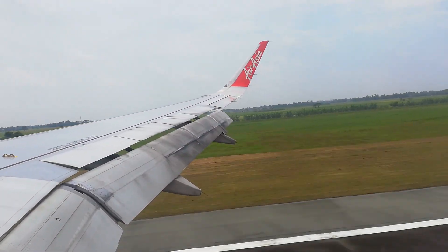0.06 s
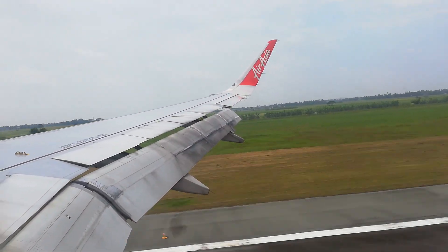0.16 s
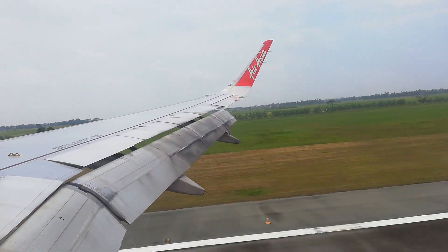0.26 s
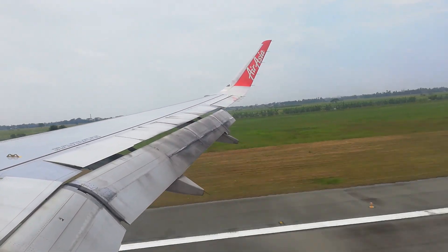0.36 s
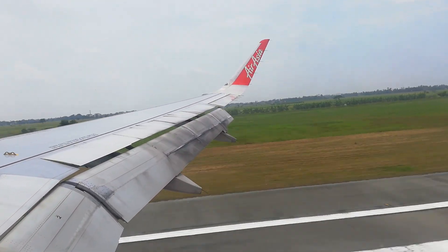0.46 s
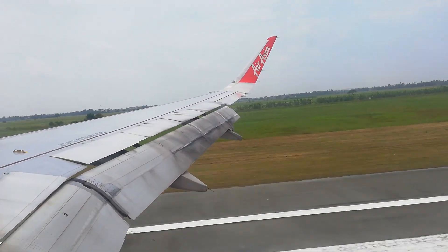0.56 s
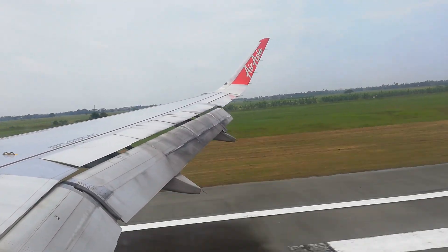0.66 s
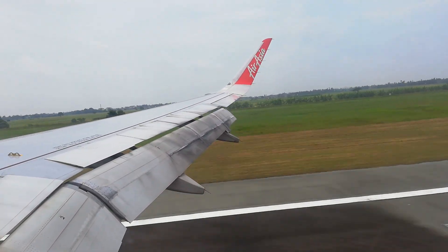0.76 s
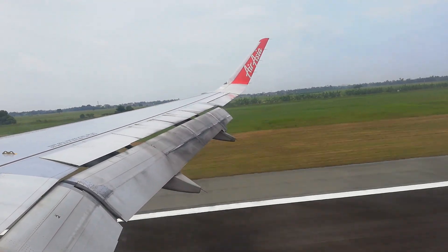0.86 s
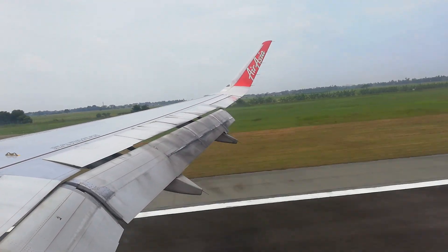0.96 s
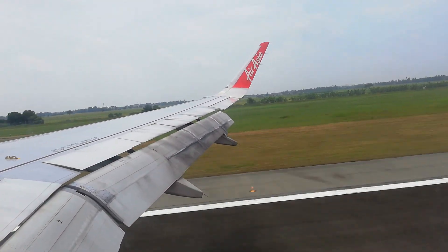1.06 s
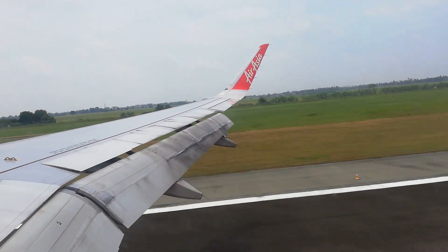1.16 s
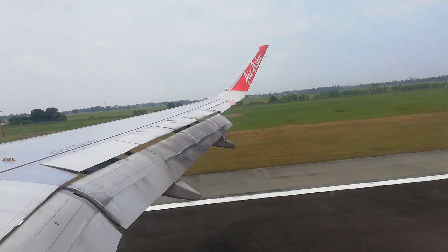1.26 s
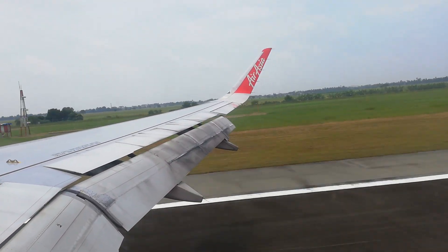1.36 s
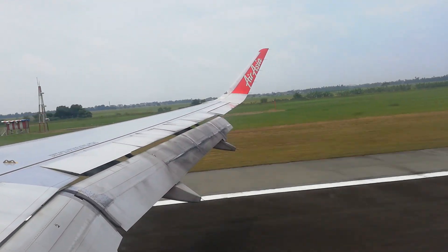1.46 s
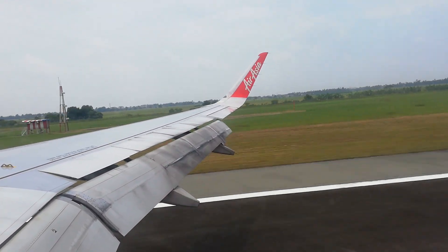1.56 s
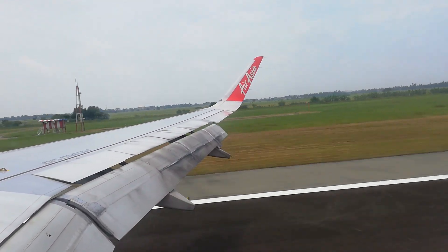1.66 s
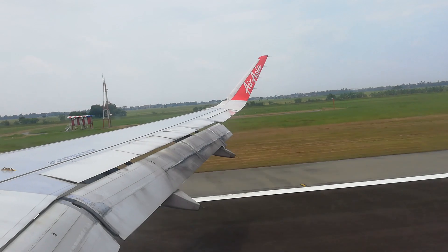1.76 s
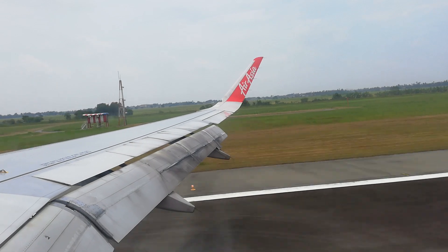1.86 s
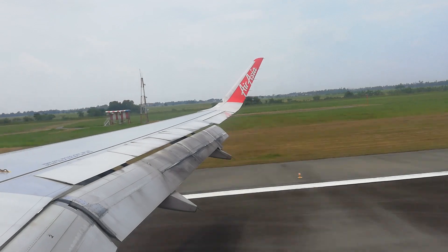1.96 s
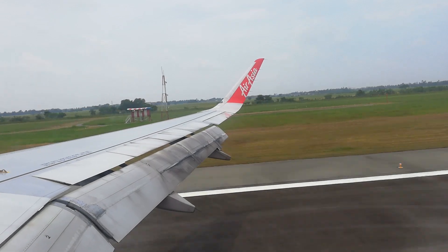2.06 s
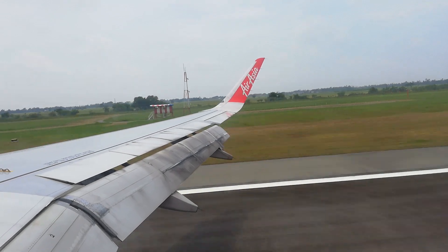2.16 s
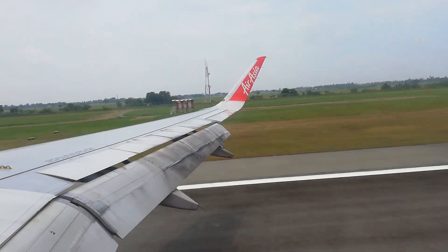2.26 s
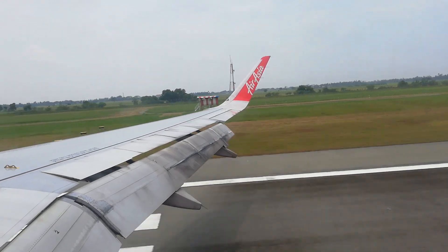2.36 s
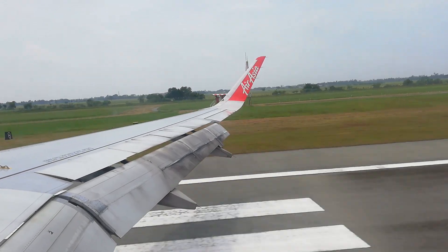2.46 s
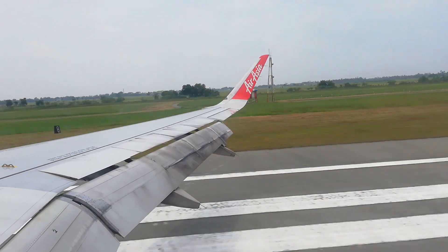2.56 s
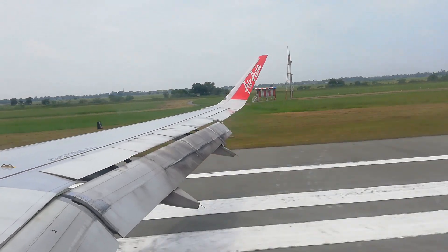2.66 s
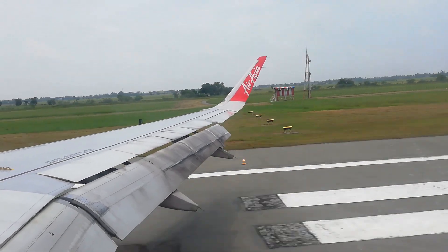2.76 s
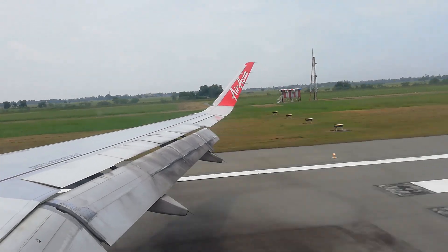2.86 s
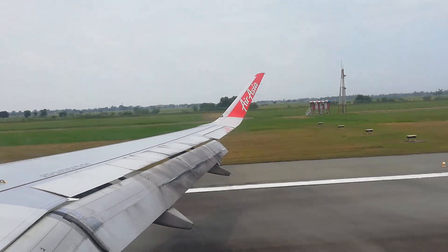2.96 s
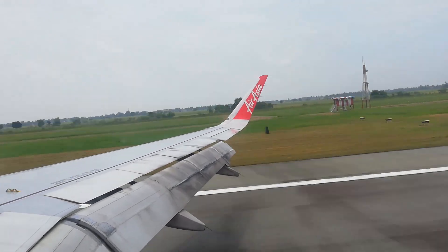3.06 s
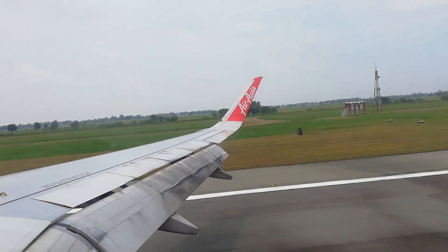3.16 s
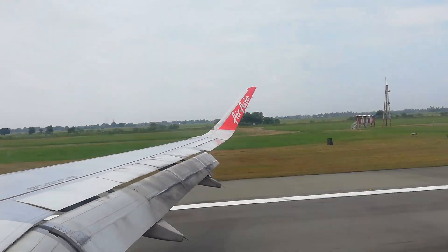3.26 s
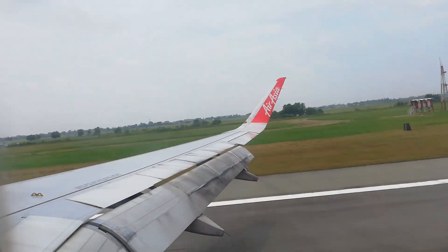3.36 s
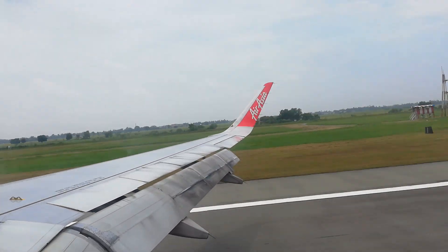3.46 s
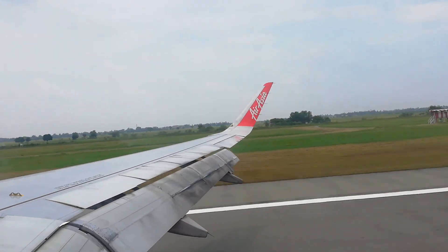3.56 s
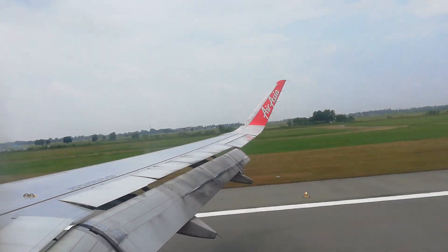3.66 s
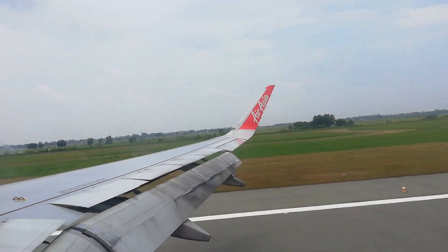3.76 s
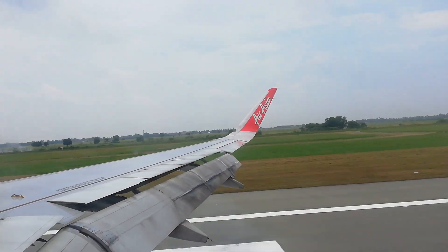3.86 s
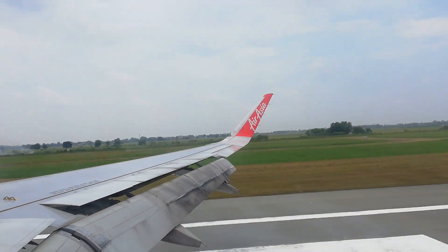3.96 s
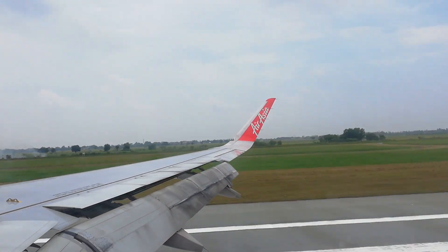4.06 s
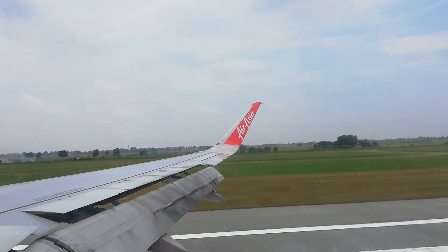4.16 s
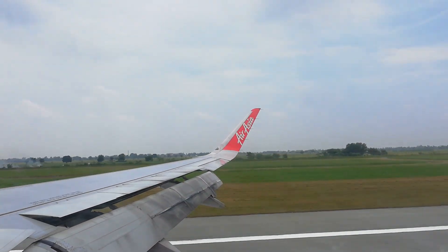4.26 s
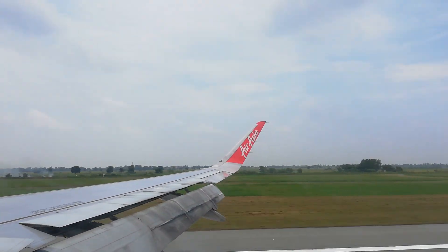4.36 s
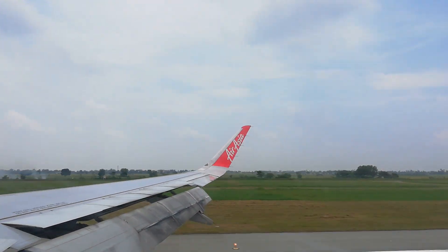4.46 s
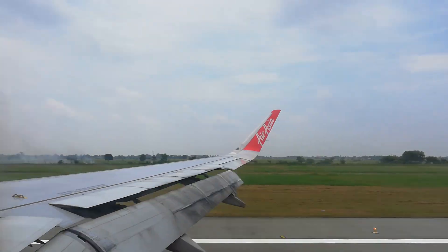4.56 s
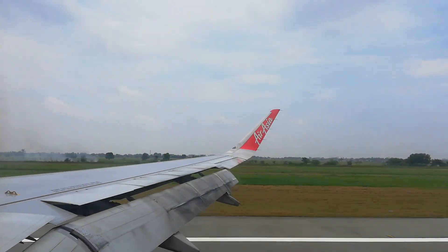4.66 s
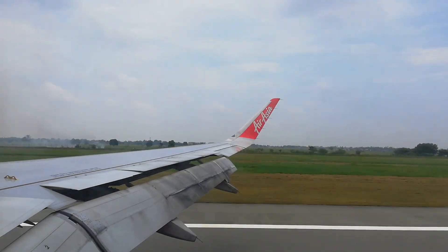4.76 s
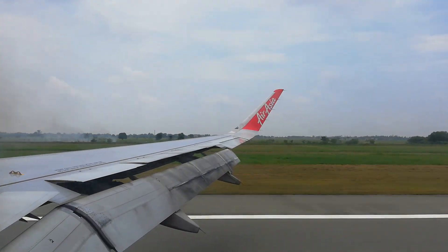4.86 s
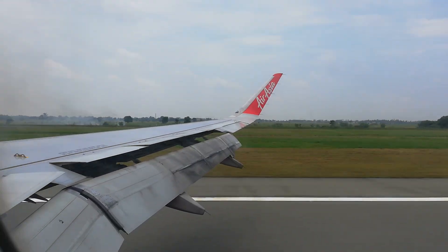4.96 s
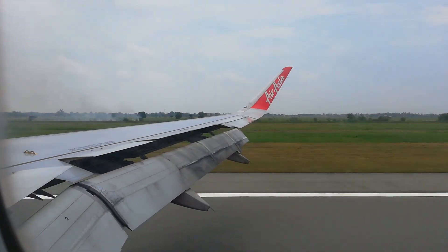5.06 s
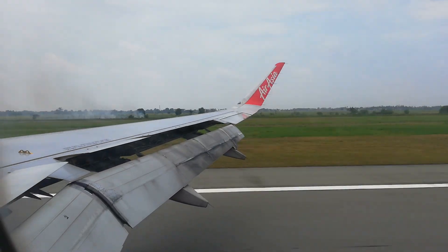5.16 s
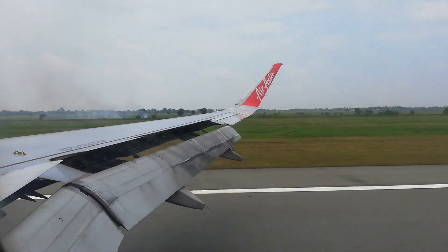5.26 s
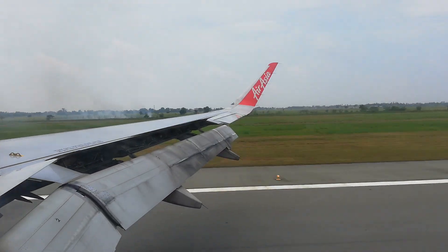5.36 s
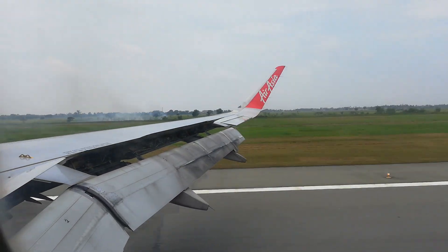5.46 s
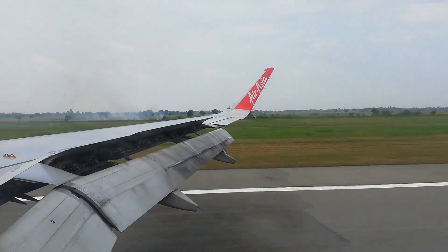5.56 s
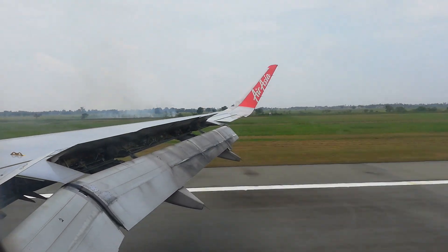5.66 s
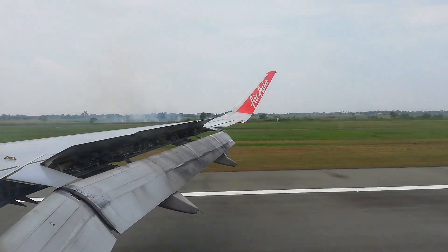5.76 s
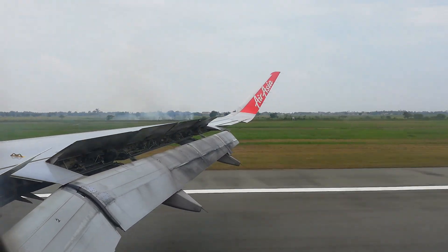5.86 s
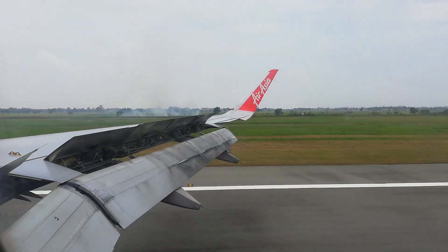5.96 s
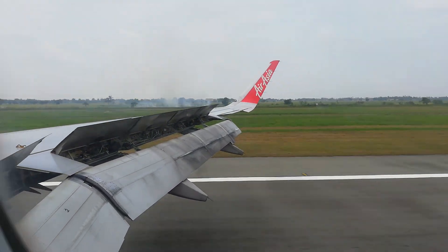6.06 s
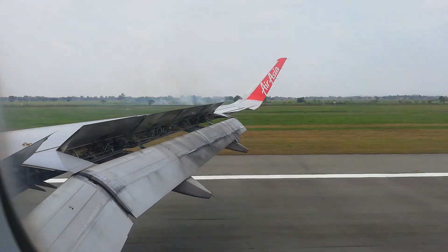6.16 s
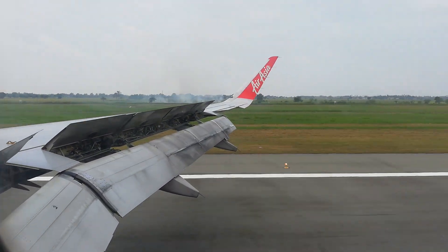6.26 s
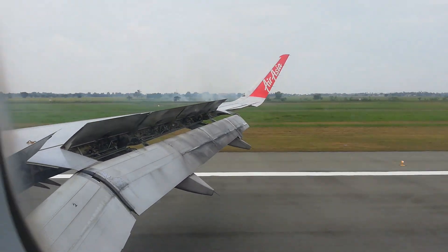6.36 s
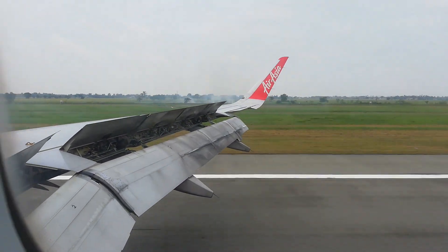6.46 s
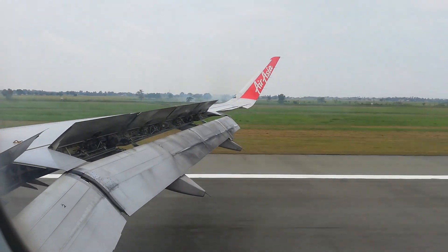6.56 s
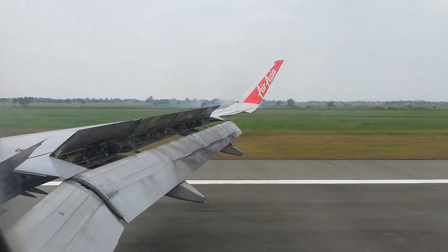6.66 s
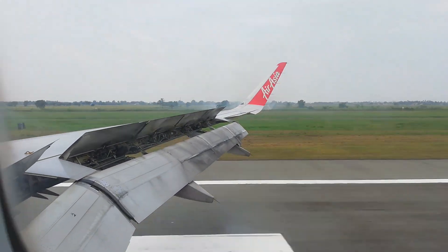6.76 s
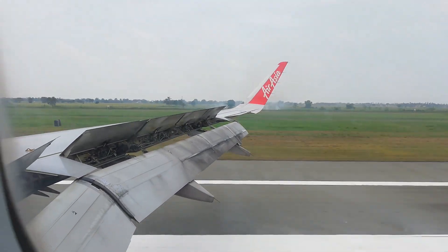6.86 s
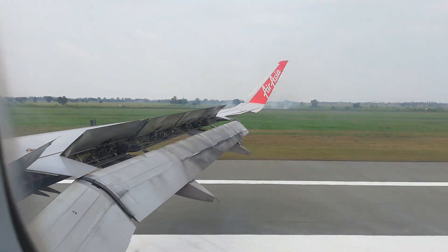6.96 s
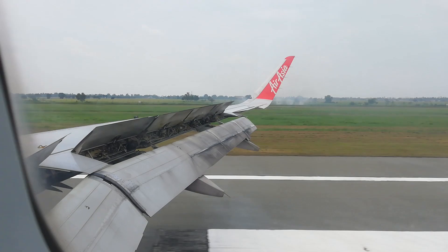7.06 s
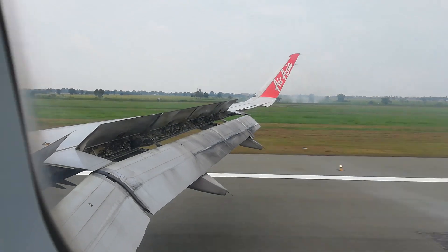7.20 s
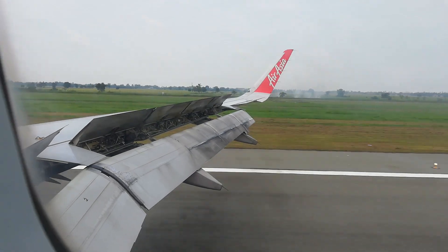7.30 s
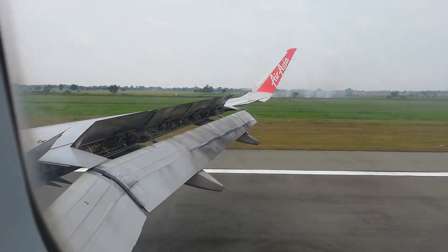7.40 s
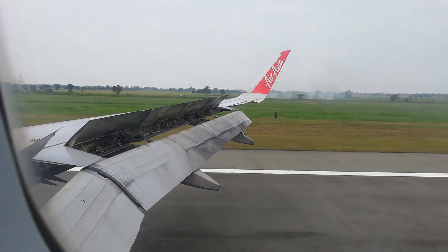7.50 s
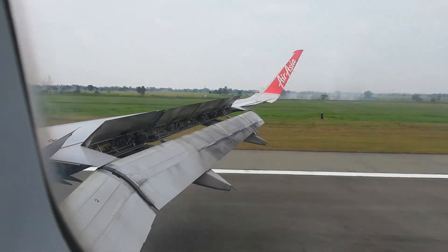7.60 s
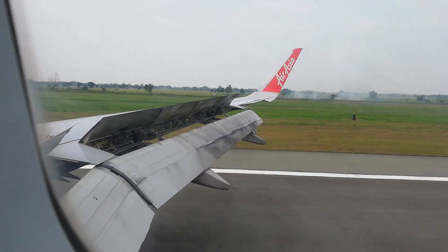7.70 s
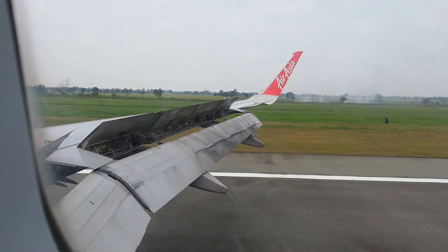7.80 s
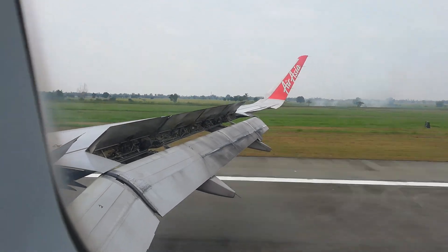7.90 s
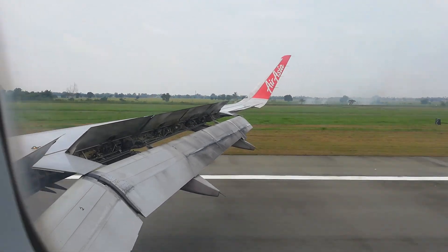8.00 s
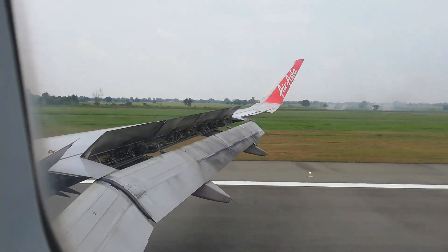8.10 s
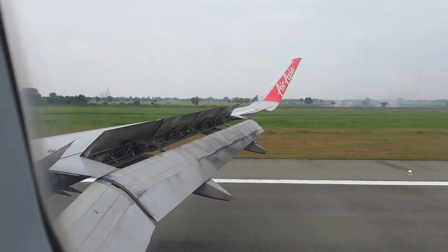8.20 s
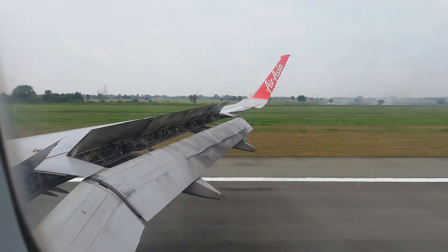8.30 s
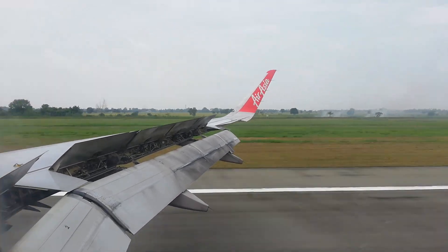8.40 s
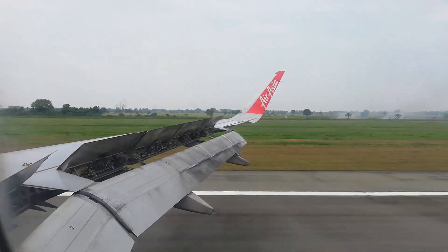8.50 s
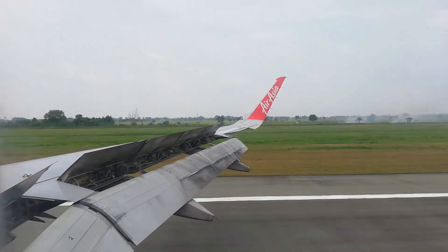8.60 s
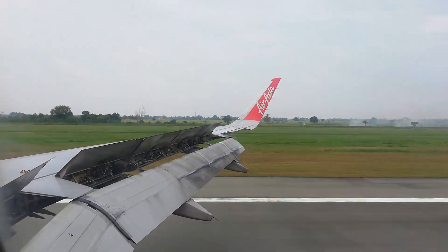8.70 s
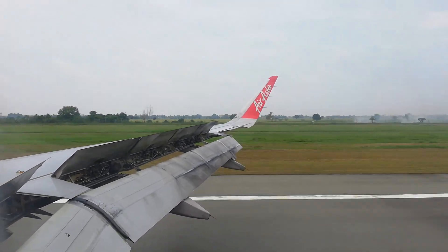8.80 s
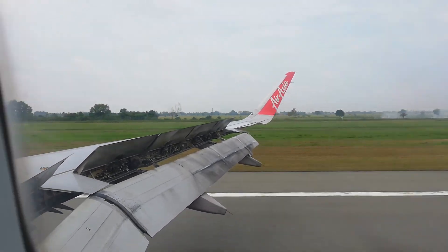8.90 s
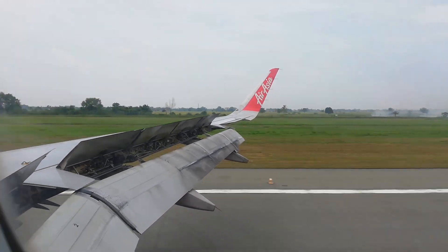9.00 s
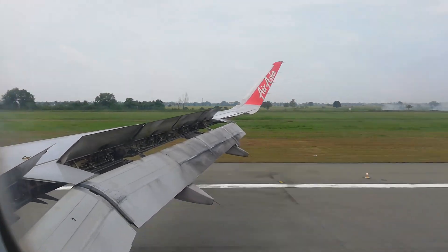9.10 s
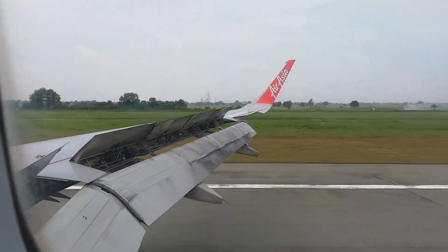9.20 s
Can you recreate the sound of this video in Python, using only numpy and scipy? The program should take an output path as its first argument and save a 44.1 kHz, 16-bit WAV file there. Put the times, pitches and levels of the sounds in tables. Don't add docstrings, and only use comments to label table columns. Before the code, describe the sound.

Handheld phone microphone at a cabin window during landing. First a muffled engine drone, vent and slipstream hiss, faint fan hum and a few tiny clicks. Then a touchdown jolt with clattering trim and hollow overhead bins, followed by much stronger floor boom. Irregular dry panel knocks and latch clicks continue to the end over surging engine roar, with a faint shaft whine rising late.

```python
import sys
import numpy as np
from scipy import signal
from scipy.fft import rfft, irfft, next_fast_len
from scipy.io import wavfile
from scipy.ndimage import uniform_filter1d

SR = 44100
rng = np.random.default_rng(int(sys.argv[2]) if len(sys.argv) > 2 else 0)


def invert_db(x):
    u = np.asarray(x, float) / 20
    return 10 ** u


def materialize(psi):
    bounded = np.clip(np.atleast_2d(psi).T, -1, 1)
    quanta = np.round(bounded * 32767).astype(np.int16)
    wavfile.write(sys.argv[1], SR, quanta)


N = 407484
T = np.arange(N) / SR
TOUCHDOWN_S, SETTLE_S = 2.94, .012
PORT_LAG_S = 26 / SR
PANEL_LAG_S = 23 / SR


def evened(x):
    return x / np.sqrt(np.mean(x ** 2) + 1e-20)


def smooth(x, length):
    return uniform_filter1d(uniform_filter1d(x, size=length), size=length)


def patchy(grid, time_size, hz_size):
    blurred = uniform_filter1d(grid, size=time_size, axis=0)
    return evened(uniform_filter1d(blurred, size=hz_size, axis=1))


def read(points, hz):
    f, value = np.transpose(points)
    return np.interp(np.log(hz + 1), np.log(f + 1), value)


def column(rows, index, t=T):
    rows = np.array(rows)
    return np.interp(t, rows[:, 0], rows[:, index])


def band(x, lo_hz, hi_hz):
    edges = [lo_hz, min(hi_hz, SR / 2.1)]
    return signal.sosfilt(signal.butter(2, edges, "band", fs=SR, output="sos"), x)


def add(mix, s, sound):
    part = mix[:, round(s * SR):][:, :sound.shape[1]]
    part += sound[:, :part.shape[1]]


def strike(t, rise_s, t60, tail_db, tail_t60):
    ring = invert_db(-60 * t / t60) + invert_db(tail_db - 60 * t / tail_t60)
    return (1 - np.exp(-t / rise_s)) * ring


def rolling(t):
    return .5 + .5 * np.tanh((t - TOUCHDOWN_S) / SETTLE_S)


def swells_db(rows, rise, flying_db, rolling_db):
    fade_db = 8.5
    roundness = 1.27
    t = np.arange(0, N / SR + .002, .002)
    peak_s, db, length_s = (v[:, None] for v in np.transpose(rows))
    rise = (rise * np.ones(len(rows)))[:, None]
    away = np.where(t < peak_s, (peak_s - t) / rise, t - peak_s) / length_s
    bed_db = flying_db + (rolling_db - flying_db) * rolling(t)
    swells = invert_db(2 * (db - fade_db * away ** roundness)).sum(0)
    return np.interp(T, t, 10 * np.log10(invert_db(2 * bed_db) + swells))


# pitch_hz, likeness_0_to_1
PORT_LIKENESS = [(60, 1), (160, 0.97), (300, 0.9), (500, 0.62), (1000, 0.14), (2000, 0.42), (5000, 0),
                 (15000, 0.1)]
# pitch_hz, lag_s
FIELD_LAG = [(60, 0.00027), (250, 0.00015), (430, 0.00024), (700, 0.00076), (1200, 0.00067),
             (16000, 0.00057)]


def diffuse(field_db, size, patchy_db, band_hz):
    hop = size // 4
    hz = np.fft.rfftfreq(size, 1 / SR)[:, None]
    t = np.arange(N // hop + 5) * hop / SR
    a, b, c, d, patches = rng.standard_normal((len(t), len(hz), 5)).T
    same = np.clip(read(PORT_LIKENESS, hz), 0, 1)
    right = a + 1j * b
    delayed = right * np.exp(-2j * np.pi * hz * read(FIELD_LAG, hz))
    left = same * delayed + np.sqrt(1 - same ** 2) * (c + 1j * d)
    z = np.array([left, right]) * invert_db(field_db(hz, t) + patchy_db * patchy(patches, 5, 9))
    inside = (hz > band_hz[0]) & (hz < band_hz[1])
    whole, part = (signal.istft(v, nperseg=size, noverlap=size - hop)[1][:, :N] for v in (z, z * inside))
    return whole / np.sqrt(np.mean(part ** 2))


def tone(hz, db):
    drift, fade = (evened(smooth(v, 3000)) for v in rng.standard_normal((2, N)))
    turn = 2 * np.pi * np.cumsum(hz * (1 + 0.00416 * drift)) / SR
    late = turn - 2 * np.pi * hz * read(FIELD_LAG, hz)
    return np.sqrt(2) * invert_db(db + 1.2 * fade) * np.sin([late, turn])


# pitch_hz, level_db
AIR = [(260, -17), (450, -2.5), (523, -3), (599, -6), (1080, -10), (1180, -14.5), (1430, -18), (2150, -17),
       (2420, -24), (4360, -22.5), (5140, -26), (8970, -29.5), (11900, -34), (13300, -48), (15600, -49),
       (16400, -62)]
# pitch_hz, change_db
ROLLING_HISS = [(600, -1.2), (1500, 2), (2500, 1), (3500, -2.5), (4800, -3), (5200, -7)]
# peak_s, level_db, length_s
JOSTLES = [(3.03, -43, 0.14), (3.17, -45, .08), (4.26, -47, 0.073), (4.38, -53, 0.13), (4.55, -43.5, 0.14),
           (4.68, -45.5, 0.076), (4.78, -49, .05), (4.89, -46, .06), (5.9, -50, 0.82), (7.05, -47, 0.33),
           (7.43, -47, 0.18), (7.73, -46.5, 0.25), (8.05, -47.5, 0.23), (8.7, -49.5, 1)]


def airflow():
    def field_db(hz, t):
        lining_edge_db = 3.5 * np.tanh((4850 - hz) / 50.)
        return read(AIR, hz) + lining_edge_db + read(ROLLING_HISS, hz) * rolling(t)
    hiss = diffuse(field_db, size=1024, patchy_db=1.2, band_hz=(600, 2600))
    return invert_db(swells_db(JOSTLES, rise=0.68, flying_db=-46.5, rolling_db=-48)) * hiss


# peak_s, level_db, length_s
DRAUGHTS = [
    (3.92, -57, 0.09),
    (4.18, -57, .06),
    (4.37, -48, .1),
    (5.4, -65, 0.33),
    (6.15, -50, 0.18),
    (6.6, -50, 0.2),
    (7.3, -57, 0.13),
    (7.65, -55, 0.12),
]


def window_whistle():
    def field_db(hz, t):
        centre_hz = 1225 + 18 * np.sin(2 * np.pi * 2.3 * t)
        return -18. * np.log10(1 + ((hz - centre_hz) / 48.) ** 2)
    whistle = diffuse(field_db, size=1024, patchy_db=3, band_hz=(1140, 1300))
    return invert_db(swells_db(DRAUGHTS, rise=0.72, flying_db=-57.5, rolling_db=-58.0) - 1.5) * whistle


# pitch_hz, level_db
WALL = [(53, -74), (90, 10.5), (103, -8.5), (113, -4), (188, 0), (394, -16), (433, -23.5), (527, -42),
        (700, -28), (910, -42), (1540, -120)]
# time_s, level_db, upper_roar_db
DRONE = [(0, -27.5, 1), (1.5, -24, -3), (2.9, -25.5, -1), (2.97, -33.5, 9), (3.07, -30.5, 1.5),
         (3.55, -24, -1.5), (3.9, -32, -3.5), (4.05, -25, 1.5), (4.22, -28, -2.5), (4.5, -25, 1.5),
         (4.75, -33.5, 9.5), (5.1, -24, -2.5), (5.4, -34, 7.5), (5.7, -25.5, -1), (6.2, -31, 1.5),
         (6.65, -22, -2), (7.4, -22.5, -6.5), (9.24, -24, -3)]


def wall_drone():
    def field_db(hz, t):
        return read(WALL, hz) + column(DRONE, 2, t) * np.clip((hz - 200) / 82.0, 0, 1)
    drone = diffuse(field_db, size=2048, patchy_db=1.65, band_hz=(125, 450))
    return invert_db(column(DRONE, 1) - 0.5) * drone


# time_s, pitch_hz, level_db
SHAFT = [(0, 545.4, -61), (1.2, 542, -55.5), (1.55, 536.5, -46), (1.8, 534.4, -47), (2.1, 530, -55.5),
         (2.27, 533, -43.5), (2.45, 524, -57), (2.65, 519, -47), (2.8, 513.6, -60), (3.2, 510.3, -63),
         (6.8, 476, -88), (7.12, 491, -53), (7.5, 481, -45), (7.9, 496, -45.5), (8.1, 501, -53),
         (8.5, 506, -51), (8.95, 518, -49.5), (9.24, 503, -53)]


def shaft_tone():
    hz, db = column(SHAFT, 1), column(SHAFT, 2)
    half_db = -38.5 + 0.29 * (db + 50)
    return tone(hz, db) + tone(hz * .485, half_db)


# pitch_hz, level_db
FANS = [
    (905, -56),
    (1155, -62),
]


def cabin_fans():
    return sum(tone(hz, db - 8.7 * rolling(T)) for hz, db in FANS)


# pitch_hz, level_db
FLOOR = [(11, -31), (20, -7), (31, -1.5), (41, 1.5), (59, 1.5), (110, -3), (145, -15.5), (172, -14),
         (260, -31.5), (400, -100)]
# time_s, pitch_hz, level_db
BOOM = [(0, 64, -4.5), (2.8, 59, 6.5), (3.1, 61.7, 9), (4.5, 60.6, 3), (5.8, 59, 2.5), (7.5, 49, 3.5),
        (9.24, 53, 4)]
# peak_s, level_db, length_s
BUMPS = [(.0, -20.5, 0.86), (.33, -21, 0.095), (.77, -20.5, 0.13), (1.85, -21, 0.22), (2.77, -21.5, 0.12),
         (2.99, -14.5, 0.071), (3.08, -13, 0.11), (3.19, -10.5, 0.25), (3.57, -12.5, 0.046),
         (3.77, -8.5, 0.048), (4.18, -10.5, 0.036), (4.58, -10, 0.31), (5.0, -14.5, 0.12),
         (5.26, -16, 0.041), (5.39, -11, 0.05), (5.58, -12, 0.035), (5.81, -9.5, 0.16), (6.1, -16.5, 0.22),
         (6.27, -12.5, .1), (6.44, -6, 0.049), (6.9, -13.5, 0.52), (7.2, -12, 0.26), (7.6, -12.5, 0.41),
         (8.12, -8.5, 0.14), (8.3, -11, 0.062), (8.45, -11, 0.24), (8.75, -6.5, 0.062), (8.93, -10, 0.024),
         (9.07, -10.5, 0.15)]


def floor_shake():
    def field_db(hz, t):
        hump = np.exp(-((hz - column(BOOM, 1, t)) / 10.0) ** 2)
        return read(FLOOR, hz) + column(BOOM, 2, t) * hump
    boom = diffuse(field_db, size=4096, patchy_db=1.0, band_hz=(22, 125))
    lumps = np.sqrt(uniform_filter1d((boom ** 2).mean(0), size=3000) + 1e-4)
    shake_db = swells_db(BUMPS, rise=0.71, flying_db=-25.5, rolling_db=-17)
    return invert_db(shake_db) * boom / lumps ** .85


# start_s, peak_db, pitch_hz
THUDS = [(.08, -60, 1946), (2.953, -51.5, 1750), (2.984, -46, 624), (3.09, -52, 1150), (3.237, -62, 1130),
         (3.307, -50, 890), (4.363, -49.5, 1254), (9.106, -53, 1420), (9.129, -55, 1320),
         (3.027, -41.5, 806), (3.149, -41, 915), (3.187, -40, 800), (3.255, -46, 880), (3.46, -43, 739),
         (4.222, -46, 846), (4.229, -56, 1490), (4.25, -45, 910), (4.272, -55, 1500), (4.507, -40, 880),
         (4.546, -39, 760), (4.577, -39, 746), (4.663, -45, 840), (4.693, -51, 1460), (6.959, -49, 1090),
         (7.725, -54, 1022), (8.111, -50, 765.2), (8.802, -51, 1006)]


def locker_thuds():
    out, t = np.zeros((2, N)), np.arange(4000) / SR
    for (s, db, hz), noise in zip(THUDS, rng.standard_normal((len(THUDS), len(t)))):
        rough = evened(band(band(noise, .65 * hz, 1.3 * hz), .5 * hz, 1.5 * hz))
        ring = .95 * np.sin(2 * np.pi * hz * t) + .55 * rough
        ring = ring * strike(t, .001, .12, -9, .3) * invert_db(3)
        add(out, s, invert_db(db + 7) * np.array([.6 * np.roll(ring, round(PORT_LAG_S * SR)), ring]))
    return out


# start_s, level_db, pitch_hz, t60_s, fuzz_0_to_1
PINGS = [
    (1.437, -54, 5700, .08, 1),
    (4.052, -57, 5870, .16, .25),
    (.016, -55, 10400, .2, 1),
    (.022, -59, 8500, .25, 1),
    (.436, -61, 8300, .5, 1),
    (.49, -60, 8200, .3, 1),
    (.47, -64, 10900, .5, 1),
    (.46, -63, 5700, .6, 1),
    (.52, -63, 6000, .4, 1),
    (5.865, -57, 5400, .2, .3),
]


def fitting_pings():
    out, t = np.zeros((2, N)), np.arange(8000) / SR
    for (s, db, hz, t60, fuzz), noise in zip(PINGS, rng.standard_normal((len(PINGS), 2, len(t)))):
        fuzzy = evened(band(band(noise, .9 * hz, 1.1 * hz), .9 * hz, 1.1 * hz))
        clear = np.sqrt(2) * np.sin(2 * np.pi * hz * t)
        add(out, s, invert_db(db - 60 * t / t60) * (fuzz * fuzzy + (1 - fuzz) * clear))
    return out


# peak_s, level_db, length_s
JOLTS = [(.001, -51.5, 0.08), (4.225, -55, 0.024), (2.545, -41, 0.025), (2.955, -45.5, 0.055),
         (7.59, -64, .04), (8.41, -49.5, 0.034), (3.62, -53, 0.037), (4.23, -66, 0.15), (5.865, -56, .05),
         (6.14, -52, 0.034), (7.07, -53, 0.047), (5.705, -42.5, 0.024), (7.67, -48.5, 0.14),
         (8.44, -50, 0.065), (8.54, -52, 0.31), (9.03, -58, 0.064)]
# peak_s, level_db, length_s
RUBS = [(0.467, -65, .05), (0.528, -60, 0.068), (.125, -56.5, 0.033), (3.024, -37.5, 0.02),
        (3.128, -41.5, 0.031), (3.09, -49.5, 0.056), (2.985, -48, .03), (3.628, -65, .04), (9.04, -57, .04),
        (3.223, -50, 0.086), (3.28, -54, 0.09), (3.42, -51.5, 0.2), (3.82, -59, 0.078),
        (4.048, -53.5, 0.086), (4.363, -56, 0.045), (4.702, -49.5, 0.18), (4.87, -48, 0.037),
        (5.07, -58.5, 0.29), (5.308, -55, 0.065), (5.473, -57, 0.16), (5.863, -53, 0.078),
        (5.955, -56, 0.066), (6.037, -54.5, 0.12), (6.21, -50, 0.031), (6.4, -65, .05), (6.517, -58, 0.11),
        (6.841, -51, 0.14), (6.904, -49, 0.014), (7.138, -57.5, 0.23), (7.453, -51.5, 0.18),
        (8.002, -51.5, 0.19), (8.17, -52, 0.13), (8.34, -55.5, 0.17), (8.701, -69, 0.42),
        (8.87, -64, 0.063), (9.19, -52.5, 0.43)]


def chatter_db():
    rise = np.repeat([.08, 0.57], [len(JOLTS), len(RUBS)])
    return swells_db(JOLTS + RUBS, rise, flying_db=-64.5, rolling_db=-61.5)


# pitch_hz, level_db
RUSTLE = [(710, -8), (1200, -26), (1430, -1.5), (1880, 2.5), (2420, -3.5), (3800, -10.5), (5250, -12.5),
          (5730, -11), (7210, -11), (12100, -15), (13200, -20), (15700, -27), (16400, -43)]


def trim_rustle():
    contacts_per_s = 400
    force_db = 2.8 * np.minimum(rng.exponential(1, N), 3)
    contacts = invert_db(force_db) * (rng.random(N) < contacts_per_s / SR)
    flicker = evened(0.043 + signal.lfilter([.012], [1, -.992], contacts))

    def field_db(hz, t):
        flutter = patchy(rng.standard_normal((len(t), len(hz))), 30, 24).T
        return read(RUSTLE, hz) - 1.7 * (hz < 2600) + 1.8 * flutter
    fizz = diffuse(field_db, size=256, patchy_db=1.5, band_hz=(5000, 15000))
    return invert_db(chatter_db() - 1.1) * flicker * fizz


# start_s, level_db
LINING = [(0.0733, -39.5), (1.435, -47), (3.419, -37), (3.5222, -45), (3.835, -40.5), (4.127, -39),
          (4.2705, -38.5), (4.5, -43), (4.52, -37), (4.577, -25), (4.7147, -39), (4.803, -28.5),
          (4.915, -48), (5.062, -31.5), (5.093, -44), (5.1846, -43), (5.4266, -37.5), (5.6797, -35.5),
          (6.0508, -40), (6.477, -35.5), (6.642, -45), (6.799, -31), (6.844, -34), (7.4386, -37.5),
          (7.7256, -23.5), (7.8397, -38.5), (8.1115, -29.5), (8.6815, -29), (9.1283, -32.5)]
# start_s, level_db
TRAY = [(.3316, -47), (4.976, -50), (2.6693, -45.5), (2.787, -59), (3.0294, -30), (3.236, -31),
        (3.306, -43), (3.676, -48), (3.7682, -42.5), (4.0227, -58), (4.692, -32.5), (4.86, -28),
        (5.283, -50), (5.5804, -45.5), (5.799, -49), (5.818, -42), (5.828, -27.5), (5.903, -44),
        (5.9808, -30), (6.2058, -31), (6.522, -44), (6.5696, -36.5), (6.958, -33.5), (7.4075, -37),
        (7.6474, -33), (7.943, -40.5), (7.969, -40), (7.9853, -30.5), (8.0539, -26), (8.3047, -43),
        (8.541, -30.5), (8.605, -49), (8.8018, -33), (8.9066, -43)]
# start_s, level_db
LATCH = [(6.133, -50), (6.497, -52), (8.25, -55), (8.408, -46), (8.445, -45), (.667, -61), (3.99, -55),
         (4.633, -50), (2.5431, -37.5), (2.9515, -44), (2.972, -51), (3.0032, -39), (3.019, -39),
         (3.041, -42), (3.055, -36.5), (3.124, -51), (3.1475, -34.5), (3.263, -42.5), (4.2236, -39.5),
         (4.362, -53), (4.645, -47), (5.3407, -51), (5.708, -44), (5.86, -41), (6.3787, -51), (7.4, -53),
         (7.426, -45), (7.456, -57), (7.589, -46), (7.6902, -41), (8.1778, -40), (8.337, -48), (8.423, -37),
         (8.7216, -34.5), (8.865, -46), (9.033, -45), (9.0976, -45)]
# body_over_crack_db, top_over_crack_db, top_t60_s
COLOURS = [
    (2, -14.5, 0.02),
    (2, -7.5, 0.017),
    (-1, -1, 0.043),
]


def tick_rows():
    rows, mid_db = [], -37.5
    for ticks, (body_db, top_db, top_t60) in zip((LINING, TRAY, LATCH), COLOURS):
        for s, db in ticks:
            body = body_db - 0.31 * (db - mid_db)
            top = min(top_db + 0.5 * max(db - mid_db, 0), max(top_db, -8.))
            rows.append((s, db, body, top, top_t60))
    return rows


# pitch_hz, level_db
PANEL = [(990, 16.5), (1280, 7), (1600, -15), (1950, 4.5), (2130, 7), (2900, 15), (3450, 8), (3730, 4.5),
         (4030, 10), (5300, 5.5), (6350, 9.5), (6900, 3), (7750, 2.5), (9350, -7)]


def trim_ticks():
    out, t = np.zeros((2, N)), np.arange(4000) / SR
    ticks = tick_rows()
    noises = rng.standard_normal((len(ticks), 2, len(t)))
    picks = rng.standard_normal((len(ticks), 3, len(PANEL), 1))
    hz, mode_db = np.transpose(PANEL)[:, :, None]
    low = hz[:, 0] < 2500
    damped = invert_db(-60 * t / .045)
    for (s, db, body_db, top_db, top_t60), noise, (size, tune, phase) in zip(ticks, noises, picks):
        late = np.roll(noise[1], round(PORT_LAG_S * SR))
        noise = np.array([0.88 * noise[0] + 0.055 * late, noise[1]])
        turn = 2 * np.pi * hz * (1 + 0.0095 * tune) * t + phase
        modes = invert_db(mode_db + 2.2 * size) * np.sin([turn - 2 * np.pi * hz * PANEL_LAG_S, turn])
        snap = band(noise, 2250, 2750) + 0.6 * band(noise, 3720, 3740) + 0.71 * band(noise, 6700, 8330)
        crack = 0.34 * evened(snap) + 0.85 * damped * evened(modes[:, ~low].sum(1))
        body = 0.59 * evened(band(noise, 510, 1870)) + 1.39 * damped * evened(modes[:, low].sum(1))
        top = evened(band(band(noise, 7200, 12400), 8000, 20000) + 0.37 * band(noise, 14300, 15700))
        knock = crack * strike(t, 20 / SR, 0.042, -25.0, 0.11)
        knock += invert_db(body_db) * body * strike(t, 0.001, 0.066, -20.5, 0.11)
        knock += invert_db(top_db) * top * strike(t, .0006, top_t60, -20, .1)
        add(out, s, invert_db(db + 1.5) * knock)
    return out


def scene():
    air = airflow() + window_whistle() + cabin_fans()
    engines = wall_drone() + shaft_tone()
    shaken = floor_shake() + locker_thuds() + fitting_pings() + trim_rustle() + trim_ticks()
    return air + engines + shaken


def band_limit(x):
    return signal.sosfilt(signal.butter(12, 16520, fs=SR, output="sos"), x)


# pitch_hz, width_hz, level_db
HOLLOWS = [(1235, 97, 4.5), (2274, 345, 2.5), (2840, 98, 3), (3750, 150, 0), (8820, 2340, 5),
           (11500, 1500, 3)]
# pitch_hz, left_minus_right_db
PORTS = [(200, 1.5), (300, -2.5), (480, -1.5), (740, -4), (1220, -4), (2010, -12), (3330, -3.5), (5500, 2),
         (9080, -4), (15000, -18)]


def record(dry):
    size = next_fast_len(N + 8192)
    hz = np.fft.rfftfreq(size, 1 / SR)
    hollow_db = sum(db / (1 + ((hz - f) / width * 2) ** 2) for f, width, db in HOLLOWS)
    ports_db = read(PORTS, hz) * (hz > 200) * np.array([[.6], [-.3]])
    treble_db = -25 * (hz > 15780)
    coloured = irfft(rfft(dry, size) * invert_db(hollow_db + ports_db + treble_db), size)[:, :N]
    ceiling, open_s = 1.05, .004
    mix = np.minimum(T / open_s, 1) * ceiling * np.tanh(coloured / ceiling)
    return band_limit(mix)


dry = scene()
out = record(dry)
materialize(out)
```